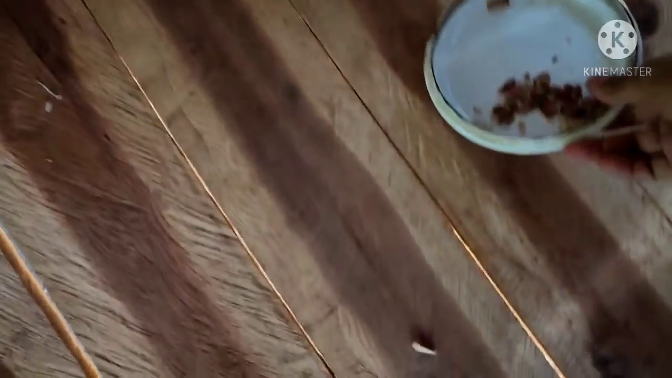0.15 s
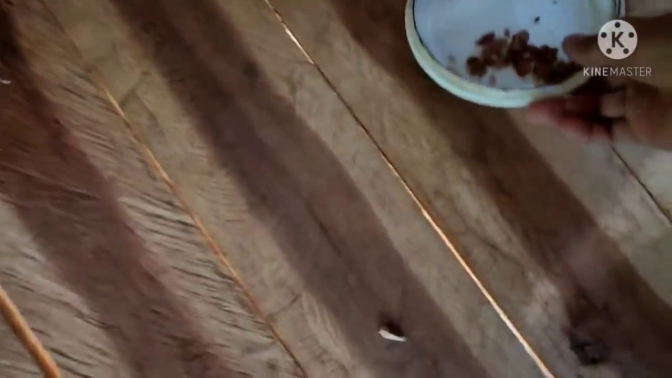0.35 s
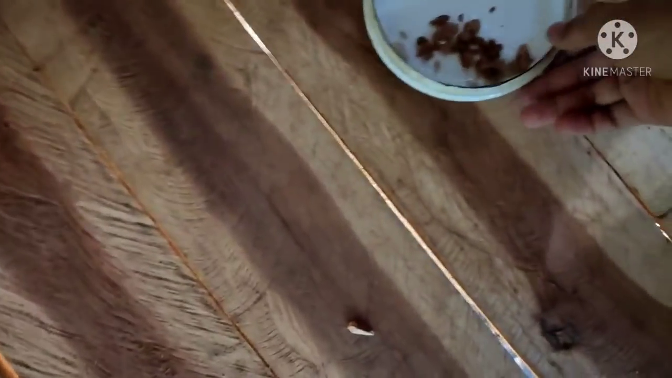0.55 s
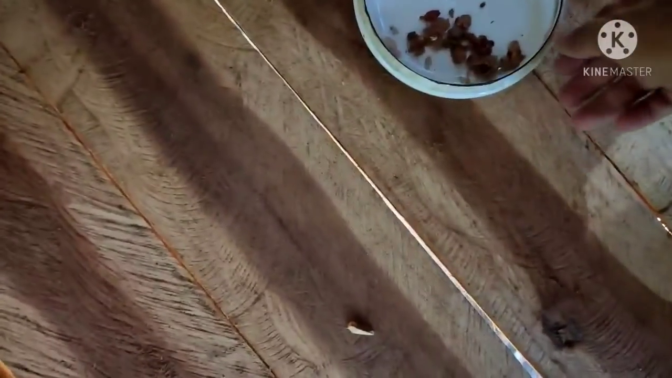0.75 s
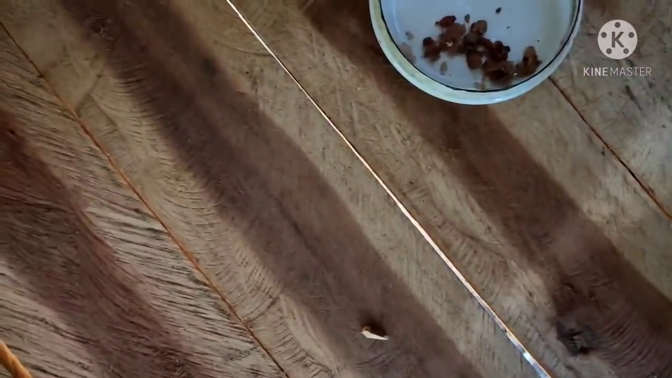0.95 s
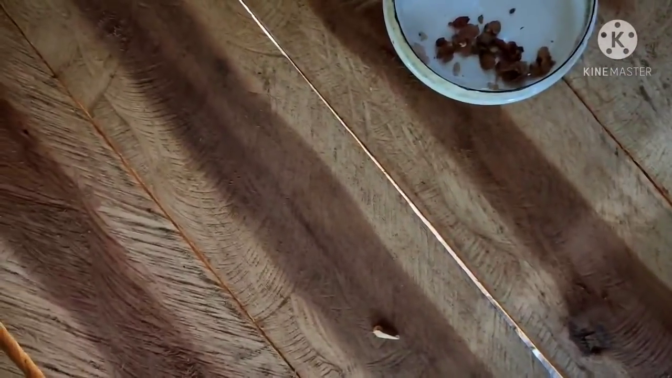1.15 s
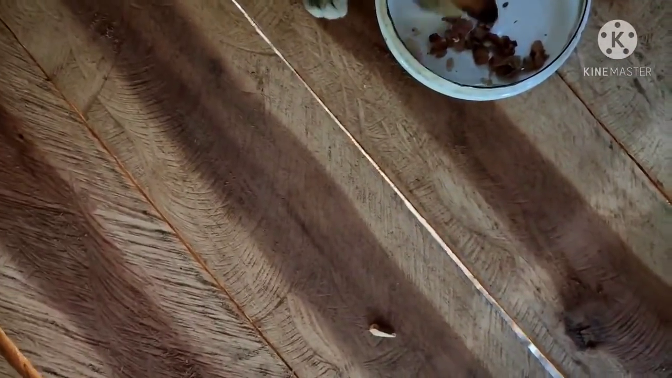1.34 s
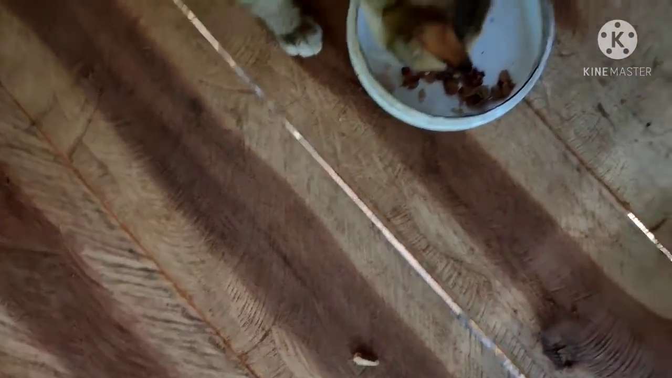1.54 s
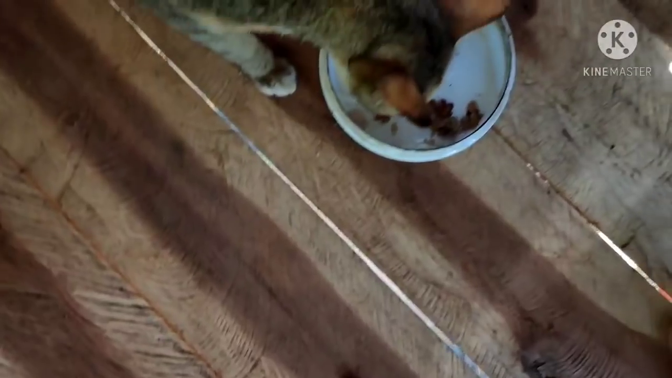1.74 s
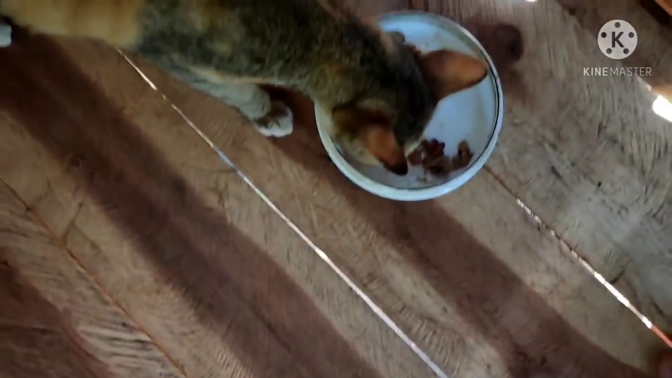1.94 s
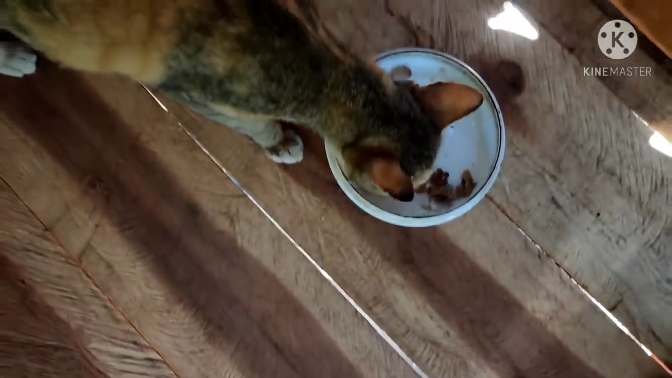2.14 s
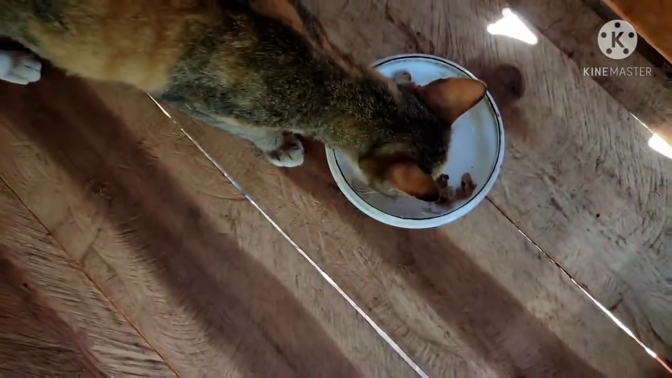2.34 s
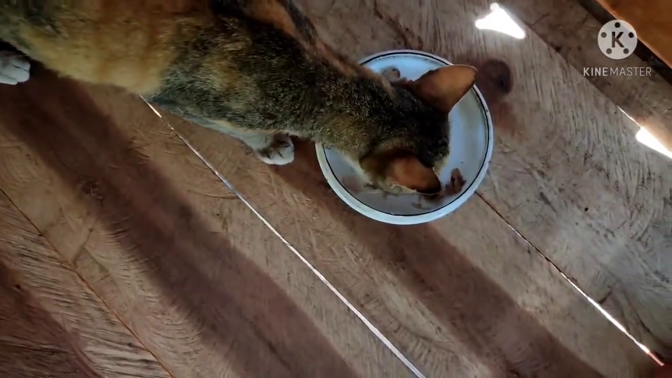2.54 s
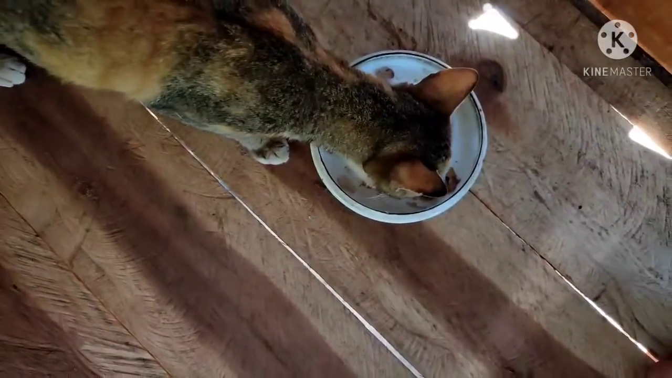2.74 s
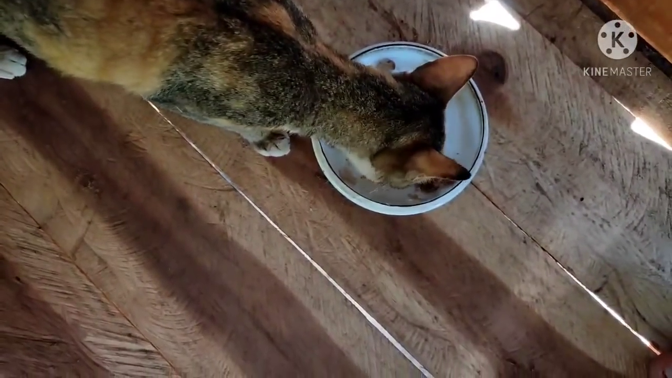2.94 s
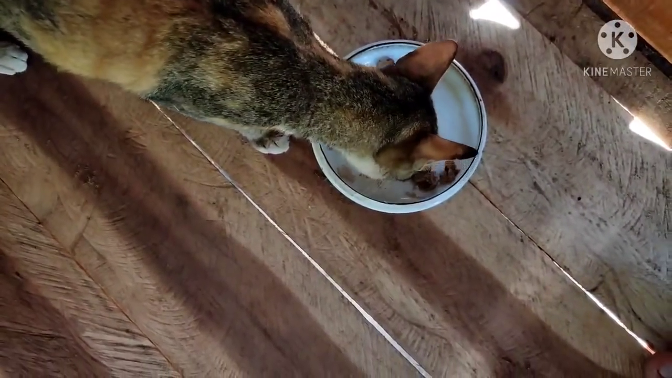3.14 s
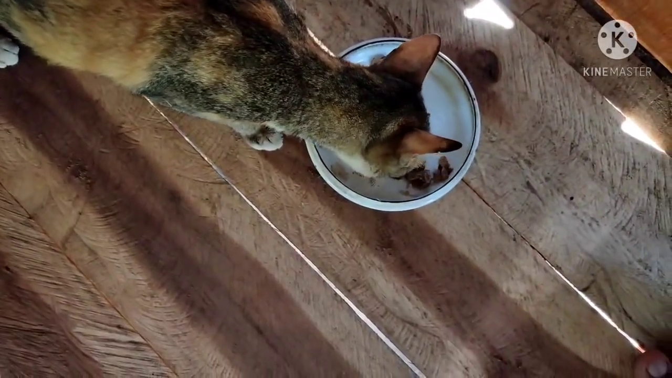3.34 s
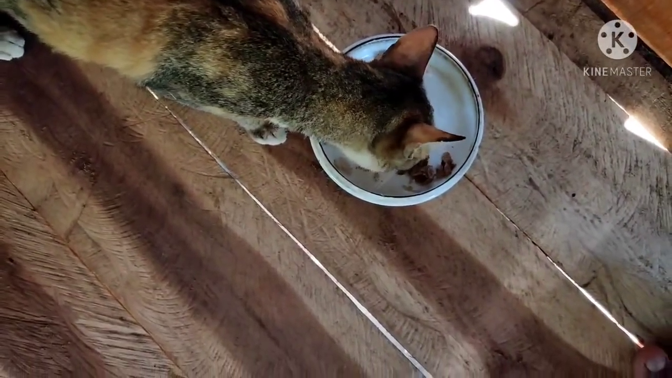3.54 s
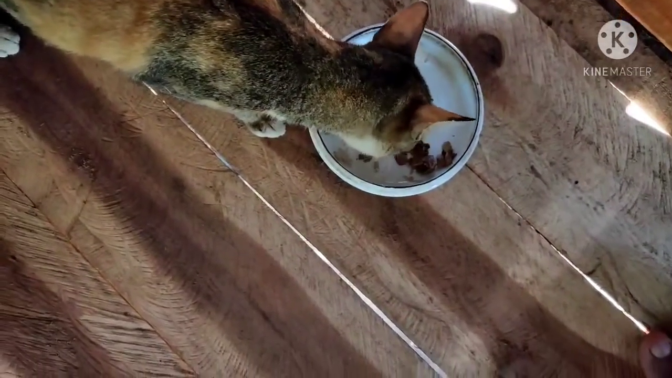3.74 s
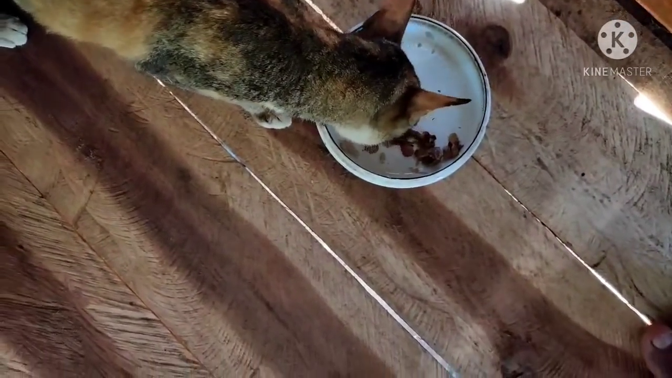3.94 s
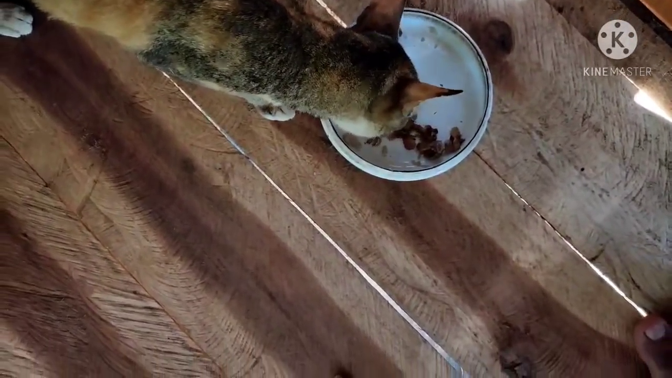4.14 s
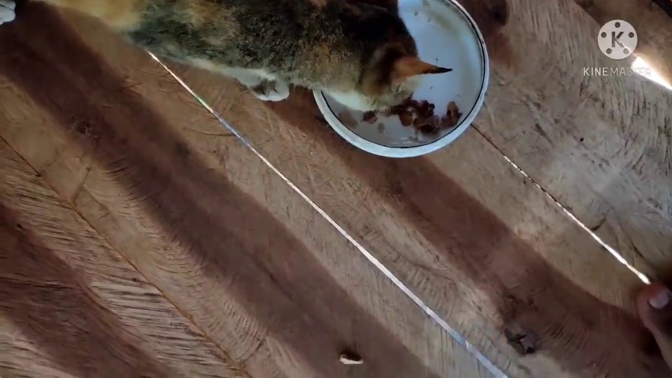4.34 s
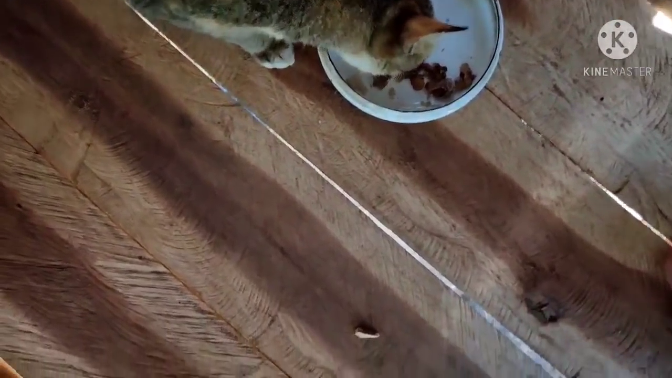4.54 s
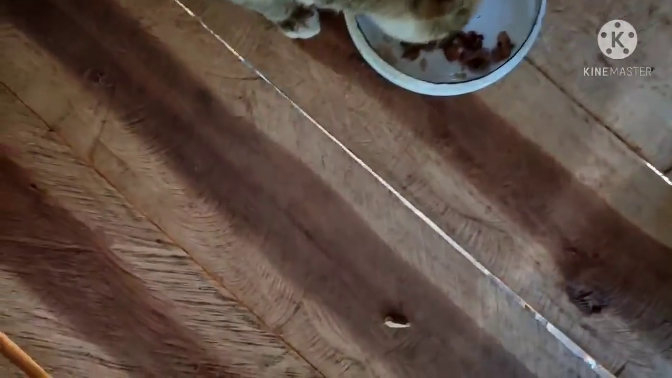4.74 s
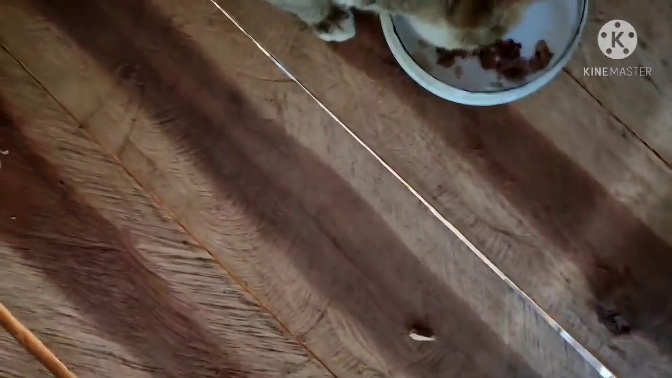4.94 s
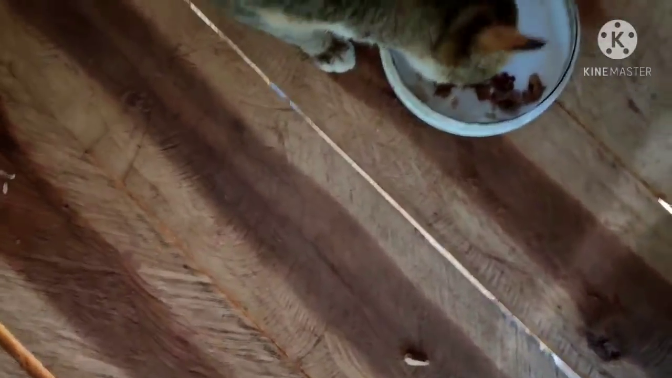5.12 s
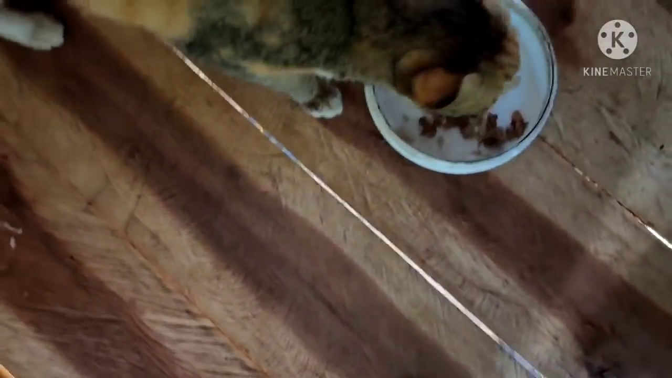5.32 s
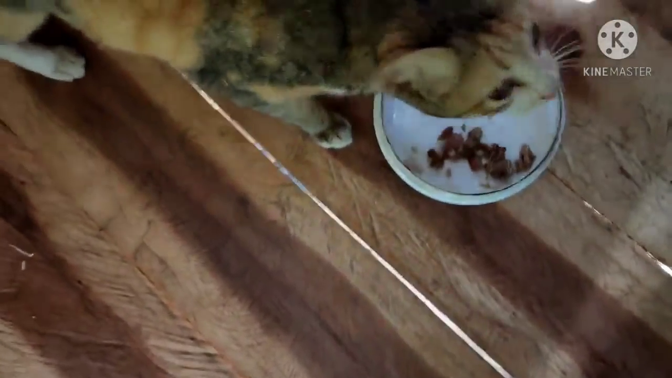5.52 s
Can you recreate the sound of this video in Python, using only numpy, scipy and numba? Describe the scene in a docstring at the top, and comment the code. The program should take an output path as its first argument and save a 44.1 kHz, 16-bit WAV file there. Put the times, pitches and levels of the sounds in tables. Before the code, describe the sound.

An enamel plate scrapes and bangs down on wooden floorboards, then a cat eats with soft smacks, clicks and small plate knocks in a quiet hut.

```python
"""Cat eating from an enamel plate

An enamel plate is set down on the floorboards of a quiet hut and a cat eats from it, nudging it about.
Knocks excite decaying modes of boards and plate; the scraping rim drives the boards with random slips.
A hiss of banded noise swells and shuts over a wavering low hum and a deep rumble.
Short rings glide upward, ticks are noise bursts, chewing and hollow rustles are narrow bands of grains.
A microphone with two spaced ports hears it all, dull above 8 kHz, and clips on the loudest knock.
"""
import sys
import numpy as np
from scipy import signal
from scipy.fft import rfft, irfft
from scipy.io import wavfile
from scipy.ndimage import uniform_filter1d
from numba import njit

SR = 44100
rng = np.random.default_rng(int(sys.argv[2]) if len(sys.argv) > 2 else 0)


def digitize_waveform(pressure):
    """Quantize a signal to 16-bit integers and store it at the path in sys.argv[1].

    Rows of a 2-D input are taken as channels; values are limited to [-1, 1].
    """
    field = np.atleast_2d(pressure).T
    bounded = np.clip(field, -1, 1)
    quanta = np.round(bounded * 32767).astype(np.int16)
    wavfile.write(sys.argv[1], SR, quanta)


N = 245897
T = np.arange(N) / SR
PORT_LAG_S, FLOOR_LAG_S = .00034, .0002  # sound from the side, sound from the boards below


def undb(db):
    """Decibel law: 20 dB is a factor of ten in amplitude."""
    return 10 ** (np.asarray(db) / 20)


def level(x, db):
    """Root-mean-square normalisation to a level in dB."""
    return x * undb(db) / np.sqrt(np.mean(x ** 2))


def band(x, lo_hz, hi_hz, order=2):
    """Band-pass filtering with a maximally flat (Butterworth) response."""
    edges_hz = [lo_hz, min(hi_hz, .45 * SR)]
    return signal.sosfilt(signal.butter(order, edges_hz, "bandpass", fs=SR, output="sos"), x)


def decay(t, t60_s):
    """Exponential decay by 60 dB in the time t60."""
    return np.exp(-np.log(1000) * t / t60_s)


def contour(table):
    """Linear interpolation in dB between the listed moments."""
    start_s, level_db = np.transpose(table)
    return np.interp(T, start_s, level_db)


def walk(rate_hz):
    """Smoothed random modulation: levels held 1 / rate and averaged twice, with a spread near 1."""
    hold = int(SR / rate_hz)
    steps = np.repeat(rng.standard_normal(N // hold + 1), hold)
    return 1.3 * uniform_filter1d(uniform_filter1d(steps, hold), hold)[:N]


def panned(db, pan_db):
    """Level-difference stereo: half the left-minus-right dB is added left, half taken off right."""
    return undb(db + np.array([pan_db, -pan_db]).reshape(2, -1) / 2)


def ports(draw, alike, lag_s=PORT_LAG_S):
    """Partial coherence: two ports share one part, the right later, and each has its own diffuse part."""
    alike = np.clip(alike, 0, 1)
    shared = draw()
    pair = np.array([shared, np.roll(shared, int(lag_s * SR))])
    return np.sqrt(alike) * pair + np.sqrt(1 - alike) * np.array([draw(), draw()])


@njit
def svf(x, hz, q):
    """State-variable resonance with moving centre and sharpness, gain 1 at the centre."""
    y, b, l = np.empty(len(x)), 0., 0.
    for i in range(len(x)):
        g, k = np.tan(np.pi * hz[i] / SR), 1 / q[i]
        v = (b + g * (x[i] - l)) / (1 + g * (g + k))
        b, l, y[i] = 2 * v - b, l + 2 * g * v, k * v
    return y


# Spectrum of the hum before its overall level is set: pitch_hz [Hz], density_db [dB per Hz]
HUM_COLOUR = [(15, -70), (25, -46.5), (53, -36), (80, -11), (100, -10.5), (118, -8.5), (140, -7),
              (160, -14), (181, -8.5), (216, -20.5), (317, -29), (479, -33), (780, -37), (1320, -61)]
# Level of the low hum, which swells around the knocks, before wavering: start_s [s], level_db [dB]
HUM = [(0.0, -39), (0.04, -50.5), (0.34, -46), (0.378, -36.5), (0.69, -48.5), (0.72, -37), (0.82, -49),
       (1.19, -65), (1.26, -49), (1.43, -64.5), (2.54, -58), (3.29, -67), (3.82, -55.5), (4.13, -70.5),
       (4.19, -50.5), (4.48, -58.5), (4.64, -43.5), (4.95, -57.5), (5.04, -46), (5.16, -60.5),
       (5.57, -62.5)]


def hum():
    """Spectral shaping of noise: a low wavering hum, nearly the same at both ports."""
    hz, db = np.transpose(HUM_COLOUR)
    bins_hz = np.fft.rfftfreq(N, 1 / SR) + 1
    colour = undb(np.interp(np.log(bins_hz), np.log(hz), db))

    def coloured():
        return level(irfft(rfft(rng.standard_normal(N)) * colour, N), 0)
    return ports(coloured, alike=0.81, lag_s=0) * undb(contour(HUM) + 1.5 * walk(9))


# Thin tones inside the hum: pitch_hz [Hz, before drift], level_db [dB rms, before wavering]
HUM_LINES = [(118, -65.5), (177, -74)]


def tones():
    """Frequency and amplitude modulation: each thin tone drifts a little in pitch, swells and sinks."""
    out = 0
    for hz, db in HUM_LINES:
        waver = undb(3 + 4 * walk(9))  # 3 dB turns the rms level into a peak
        phase = 2 * np.pi * np.cumsum(hz * (1 + 0.019 * walk(4.4))) / SR
        out = out + undb(db) * waver * np.sin(phase)
    return out


# Deep rumble that swells and sinks, before its unevenness: start_s [s], level_db [dB]
RUMBLE = [(0.0, -58), (0.18, -52), (0.31, -74), (0.39, -46), (0.45, -82), (0.74, -60.5), (0.78, -65.5),
          (1.13, -82), (1.3, -66), (1.44, -81), (2.48, -76.5), (3.04, -92), (4.67, -70), (4.89, -76),
          (5.05, -62), (5.2, -70), (5.57, -89)]


def rumble():
    """Low-frequency band noise: a deep uneven rumble, the same at both ports."""
    deep = level(band(rng.standard_normal(N), 27, 82, order=3), 0)
    return undb(contour(RUMBLE) + 2.0 * walk(6)) * deep


# Swells of drag and hiss: start_s [full strength, s], rise_s [s], hold_s [s], drag_db [dB],
# drag_pitch_hz [Hz], sharpness [Q], hiss_db [dB], middle_db [middle of the hiss, relative dB],
# pan_db [left minus right, dB]
SWELLS = [(0.0, .01, 0.025, -39, 575, 0.23, -52, 7, 0.5), (0.141, 0.015, 0.028, -30, 709, 0.3, -43.5, 7, 1),
          (0.26, .1, 0.087, -49, 424.2, 1.1, -59.5, -7, 2),
          (0.369, 0.0056, 0.0067, -33.5, 698.5, 1.4, -40, -19, 2),
          (0.469, 0.012, .02, -34, 491.2, 1.9, -51.5, 3.5, -1),
          (0.703, .005, 0.022, -45.5, 481.2, 1.7, -55.5, -0.5, 2),
          (0.998, 0.054, .05, -79, 473, 2.9, -73.5, -16, 0),
          (1.211, 0.013, 0.064, -71, 877.4, 3.3, -47, -6, 3),
          (1.266, 0.036, .06, -46, 792.6, 1, -44.5, 1, 3.5),
          (1.578, .12, .04, -65, 912.3, 2.6, -50, -0.5, 6.5),
          (1.677, 0.076, .13, -71.5, 888, 2.2, -50, -5, 4),
          (1.927, .1, 0.033, -73.5, 970, 3.4, -52.5, -12.5, 6.5),
          (2.164, 0.18, .02, -64.5, 966, 2.2, -48.5, -7, 5),
          (2.314, 0.16, 0.015, -53.5, 847, 1.4, -44, -0.5, 4.5),
          (2.442, 0.046, 0.012, -57.5, 897, 2, -43.5, -0.5, 5),
          (2.458, .005, 0.037, -47, 591.5, 3.7, -44, 5, 0.5),
          (2.568, .03, .05, -56.5, 591, 2.6, -72, -4, 4),
          (2.835, 0.11, 0.088, -86, 519.9, 2, -77.5, -23, 9.5),
          (3.291, 0.14, .08, -74, 1000, 2, -59, -11.5, 7),
          (3.449, 0.04, 0.11, -58.5, 925.4, 2.2, -48, -1.5, 4),
          (3.647, .04, 0.13, -76.5, 843, 2.5, -54.5, -10.5, 2.5),
          (3.789, 0.066, 0.06, -45.5, 638.3, 0.46, -47.5, 1.5, 3.5),
          (4.037, .06, 0.074, -84.5, 801, 2.7, -64, -16, 10),
          (4.158, 0.055, .02, -50.5, 854.7, 1.8, -52.5, 2.5, 0.5),
          (4.186, 0.014, .03, -41.5, 564.3, 0.65, -50, -2.5, 2), (4.265, .05, .05, -49, 542, .8, -60, 0, 0),
          (4.345, 0.051, 0.097, -45, 510.5, 0.44, -53, 1.5, 2.5),
          (4.494, 0.058, 0.049, -57, 777.4, 1.7, -53.5, 2.5, 4.5),
          (4.566, 0.027, .03, -40, 543.7, 1.3, -53.5, 2, 2),
          (4.621, .005, 0.055, -36, 781, 2.1, -46, 1, 0.5),
          (4.718, 0.07, 0.2, -59.5, 942, 1.2, -45.5, 2.5, 4.5),
          (4.934, 0.045, 0.12, -59.5, 919, 2.6, -52, 1.5, 4),
          (5.157, .05, 0.087, -76.5, 682, 1.6, -65.5, -15, 8.5),
          (5.346, 0.16, 0.094, -63.5, 598.3, 1.8, -61, -16, 13),
          (5.505, 0.12, 0.023, -57.5, 761.6, 1.7, -53, -15.5, 6)]
RISE_DB = 22.5  # a swell grows by this much during its rise
DRAG_FADE_DB_PER_S, HISS_FADE_DB_PER_S = 230.5, 220


def follow(db, fade_db_per_s, *traits):
    """Power summation: swells rise, hold and fade; gives the total in dB and power-weighted traits."""
    s, rise, hold = np.transpose(SWELLS)[:3, :, None]
    t = T[::32]
    growth_db = -RISE_DB * np.maximum(s - t, 0) / np.maximum(rise, .005)
    fade_db = -fade_db_per_s * np.maximum(t - s - hold, 0)
    power = undb(db[:, None] + growth_db + fade_db) ** 2 + 1e-30
    total = power.sum(axis=0)
    curves = [10 * np.log10(total)] + [trait @ power / total for trait in traits]
    return [np.interp(T, t, c) for c in curves]


def hiss():
    """Band-limited noise: a bright peak and a flatter middle whose narrow bands open and shut in patches."""
    *_, db, mid_db, pan_db = np.transpose(SWELLS)
    db, mid_db, pan_db = follow(db, HISS_FADE_DB_PER_S, mid_db, pan_db)

    def noise(lo, hi):
        return lambda: level(band(rng.standard_normal(N), lo, hi, order=2 if lo > 6000 else 4), 0)
    out = ports(noise(6400, 7400), alike=.2) + undb(-6) * ports(noise(5200, 7900), alike=.25)
    out = out * undb(0.93 * walk(18) + 2.3 * walk(90.0))
    flutter_db = 2.0 * walk(250.0)  # a fast random flutter shared by all the middle bands
    patchy_db = np.clip(2.3 - .35 * mid_db, 1.5, 8)  # the fainter the middle, the patchier
    for hz in np.arange(1150, 6000, 200):
        tilt_db = -18.5 - 1.0 * np.log2(hz / 2500)
        gain = undb(mid_db + tilt_db + patchy_db * walk(13.0) + flutter_db)
        out = out + gain * ports(noise(hz, hz + 200), alike=0.034)
    return out * panned(db, pan_db)


# Modes of the floorboards: pitch_hz [Hz], level_db [relative dB], t60_s [full ring time, s]
BOARDS = [(230, -2.5, .17), (280, -4.5, 0.16), (379.5, -3.5, 0.18), (426.3, -10, .15), (484, -8, .14),
          (538, -4, 0.09), (630.8, -6, 0.11), (685.6, -2, 0.064), (800, -2, 0.13), (900.3, -2.5, 0.08),
          (1006, -10.5, 0.11), (1127, -3.5, 0.09), (1232, -13, 0.086), (1434, -17, 0.13), (1627, -15, 0.27),
          (1740, -15, 0.13), (1838, -17, .09), (2110, -15.5, 0.11), (2280, -13, 0.063), (2518, -13, 0.03),
          (2700, -19, 0.054), (3293, -22, .05)]
# Modes of the enamel plate: pitch_hz [Hz], level_db [relative dB], t60_s [full ring time, s]
PLATE = [(464, 4, 0.12), (550, -11.5, 0.06), (790, -1, 0.12), (800, -20.5, 0.063), (1106, -9.5, 0.083),
         (1916, -10.5, 0.065), (1994, -27, .07), (2720, -21, .06)]
WOOD_TOP_HZ = 1320  # the boards pass little above this pitch


def scrape():
    """Stick-slip friction: dense uneven slips ring the boards around the pitch of the drag."""
    _, _, _, db, hz, q, _, _, pan_db = np.transpose(SWELLS)
    db, hz, q, pan_db = follow(db, DRAG_FADE_DB_PER_S, hz, q, pan_db)
    q = np.clip(q, .7, 8)

    def slips():
        impulses = (rng.random(N) < 1500 / SR) * rng.standard_normal(N)  # about 1500 a second
        grit = impulses * undb(1.2 * walk(60))
        wood = sum(svf(grit, f + 0 * T, f / 35 + 0 * T) for f, _, _ in BOARDS[:13] + PLATE[:1])
        # a sharper drag passes fewer modes, each the louder
        focused = np.sqrt(q) * svf(svf(wood, hz, q), hz, q)
        return level(focused, 0) + level(wood, -2.5)
    return panned(db, pan_db) * band(ports(slips, alike=0.4), 150, WOOD_TOP_HZ, order=4)


# Short bright ticks, several at the onset of knocks: start_s [s], level_db [dB, scales the snap],
# pan_db [left minus right, dB]
TICKS = [(0.1452, -41, 3), (1.208, -66, 4.5), (1.246, -31, 11), (3.507, -34, 6), (0.44, -32, 3),
         (1.6, -35, -4), (0.3765, -19.5, 1.5), (4.655, -40, 2), (2.169, -46.5, -3.5), (2.2957, -34.5, 8),
         (2.4671, -20, 11), (4.1872, -31, -8), (4.5483, -36, -2), (4.6185, -28, 1), (5.1073, -42, 7)]


def ticks():
    """Impulsive excitation: a few milliseconds of bright noise."""
    out, t = np.zeros((2, N + SR)), np.arange(SR // 20) / SR
    for s, db, pan_db in TICKS:
        noise = level(band(rng.standard_normal((2, len(t))), 930, 12000, order=2), -7.5)
        i = int(s * SR)
        out[:, i:i + len(t)] += panned(db, pan_db) * noise * np.exp(-t / 0.0048)
    return out[:, :N]


SPOT_DB = 6  # a mode one octave off the centre of a blow is this much weaker
BRIGHT_HZ, FULL_CRACK_DB = 1300, -8  # modes above this pitch sound fully only in a crack this bright


def ring(modes, t, mid_hz, damp, crack_db):
    """Modal superposition: decaying modes, strongest near the blow's centre, weighed anew at each spot."""
    hz, db, t60 = np.transpose(modes)[:, :, None]
    spot = rng.standard_normal((4, len(modes), 1))
    octaves_off = np.log2(np.minimum(hz, 1500) / mid_hz)
    gain = undb(db + 1.5 * spot[0] - SPOT_DB * octaves_off ** 2)
    gain = gain * np.where(hz > BRIGHT_HZ, undb(0.4 * (crack_db - FULL_CRACK_DB)), 1)
    lagged = t - np.array([0, FLOOR_LAG_S])[:, None, None]
    turn = 2 * np.pi * hz * lagged + .7 * spot[1] + .3 * spot[2:]  # the ports differ a little
    y = (gain * np.sin(turn) * decay(t, damp * t60)).sum(axis=1)
    return y / np.sqrt(np.sum(gain ** 2))


# Rim meets wood: start_s [s], level_db [dB, scales the blow], thud_db [floor thud, relative dB],
# crack_db [bright crack, relative dB], pan_db [left minus right, dB], pitch_hz [centre of the body, Hz],
# plate_share [0-1], ring_share [share of the full ring time], drop_s [level drops after, s]
KNOCKS = [(0.305, -37.5, 0.5, -34, -11, 442, 0.58, 0.2, 0.093),
          (0.358, -20.5, -18, -32.5, 2, 495, 0.07, 0.49, .077),
          (0.376, 4.5, -22, -24, 1.5, 860, 0.05, 0.55, .077),
          (0.463, -22, -9, -14.5, -1, 470, 0.2, 0.31, .07), (0.702, -28, 3.5, -46, 1, 283, 0.2, 0.39, .07),
          (0.716, -9, -18, -37, 1, 600, 0.04, 0.82, .059),
          (1.246, -37, -13.5, -23, 1.5, 585, 0.39, 1.3, 0.084),
          (1.26, -29, -11, -24.5, 5, 490, 0, .4, .077),
          (2.468, -21.5, -25, -13.5, 6, 847, 0.2, 1.07, 0.058),
          (2.485, -24.5, -12, -28, -2, 445, 0.43, 0.79, 0.077),
          (2.649, -39.5, -27, -42, -3.5, 720, 1, 0.42, .045),
          (4.186, -23, -17, -16, -2.5, 544, 0.54, 1.2, 0.074),
          (4.283, -38, -9, -23.5, -1, 400, 0.2, 0.36, .07),
          (4.341, -36.5, -15.5, -28, -4, 503, 0.35, 1.3, 0.054),
          (4.547, -22, -15.5, -19, -2, 600, 0.58, 0.89, 0.041),
          (4.618, -17, -22, -19.5, -1.5, 520, 0.62, 0.92, 0.14),
          (4.652, -24.5, -20, -42, -2, 800, 0.91, 1.74, 0.024),
          (5.009, -41, -6, -22, 14, 834, 0.21, 0.69, .077)]
THUD_HZ, THUD_T60_S = 145, .15
CONTACT_MS, SOFTER = 0.42, .5  # the duller the crack, the longer the rim takes to land
DROP_DB = -8.5  # the ring drops abruptly in level


def knocks():
    """Impact excitation: each blow rings boards and plate as the rim rattles, with a thud and a crack."""
    out, t = np.zeros((2, N + SR)), np.arange(SR // 3) / SR
    n = SR // 30
    for s, db, thud_db, crack_db, pan_db, mid_hz, share, damp, drop_s in KNOCKS:
        share, damp = np.clip(share, 0, 1), max(damp, .1)
        rattle = .08 * np.exp(-t[:n] / .012) * rng.standard_normal(n) * (rng.random(n) < .03)
        rattle[0] = 1  # the first contact
        body = (1 - share) * ring(BOARDS, t, mid_hz, damp, crack_db)
        body = body + share * ring(PLATE, t, mid_hz, damp, crack_db)
        # the many board modes too close to tell apart blur into a short dull roar
        roar = level(band(rng.standard_normal((3, len(t))), mid_hz / 1.7, 1192, order=6), -14.0)
        roar = roar * np.exp(-t / (damp * 0.024))
        body = body + 0.39 * roar[0] + 0.21 * roar[1:]
        contact_ms = np.clip(CONTACT_MS * undb(SOFTER * (FULL_CRACK_DB - crack_db)), .3, 8)
        onset = (1 - np.exp(-t * 1e3 / contact_ms)) ** 2
        body = signal.fftconvolve(-body * onset, rattle[None])[:, :len(t)]
        body = body / np.sqrt(np.mean(body[:, :SR // 70] ** 2)) * undb(-7)  # level of the first 14 ms
        body = body * undb(DROP_DB * np.clip((t - drop_s) / .008, 0, 1))
        thud = np.sin(2 * np.pi * THUD_HZ * t) * decay(t, THUD_T60_S) * (1 - np.exp(-t / 0.0011))
        crack = level(band(rng.standard_normal((2, len(t))), 1500, 2500, order=2), crack_db)
        crack = crack * (np.exp(-t / 0.0076) + 0.48 * np.exp(-t / 0.025))
        i = int(s * SR)
        out[:, i:i + len(t)] += panned(db, pan_db) * (body + crack) + undb(db + thud_db) * thud
    return band(out[:, :N], 110, 9000, order=3)


ROOM_T60_S, ROOM_DB = 0.24, -20.5


def room(x):
    """Reverberation: the small wooden hut answers with a short dull tail, different at each port."""
    t = np.arange(SR // 2) / SR
    tail = band(rng.standard_normal((2, len(t))), 110, 1300) * decay(t, ROOM_T60_S) * (t > .006)
    tail = undb(ROOM_DB) * tail / np.sqrt(np.sum(tail ** 2, axis=1, keepdims=True))
    return x + signal.fftconvolve(x.mean(axis=0, keepdims=True), tail, axes=1)[:, :N]


# Narrow bands that stand out of the rustle for a moment: start_s [s], length_s [s], pitch_hz [Hz],
# width_hz [Hz], level_db [dB, scales the grains]
HOLLOWS = [(0.566, 0.083, 850, 299.2, -54.5), (1.215, 0.078, 2250, 250, -56),
           (1.695, 0.12, 2350, 200, -65.5), (1.741, 0.068, 880, 248, -61.5), (1.936, 0.15, 2600, 200, -69),
           (2.03, .08, 1750, 200, -72.5), (2.111, 0.047, 3400, 301, -66), (2.127, 0.098, 1000, 252, -63),
           (2.212, 0.074, 610, 149, -60.5), (2.3, 0.067, 820, 200, -53.5), (2.553, 0.0967, 590, 60, -50.5),
           (3.261, 0.075, 2450, 248, -70.5), (3.288, .08, 3200, 343, -72), (3.352, 0.08, 1600, 200, -70.5),
           (3.484, .13, 950, 253, -56.5), (3.74, .05, 900, 201, -55), (4.132, 0.0527, 833, 70, -43),
           (4.498, .045, 930, 150, -58), (4.717, 0.062, 2650, 300, -51.5), (5.304, 0.14, 620, 249.3, -61),
           (5.337, .06, 1300, 250, -75), (5.418, .11, 1950, 297, -70), (5.43, 0.15, 840, 200, -63)]
HOLLOW_EDGE_S, HOLLOW_PAN_DB = 0.0089, 9.5  # opening and shutting time, left minus right


def hollows():
    """Band-pass resonance: grainy noise in one narrow band that opens and shuts quickly."""
    out = np.zeros((2, N))
    lag = 15  # samples between the ports
    for s, length, hz, width_hz, db in HOLLOWS:
        i, n = int(s * SR), int(max(length, .02) * SR)
        t = np.arange(min(n, N - i)) / SR
        grains = rng.standard_normal((3, SR // 4)) * (rng.random(SR // 4) < .1)
        x = level(band(grains, hz - width_hz / 2, hz + width_hz / 2, order=3), -3)
        x = x[:, -len(t) - lag:]
        pair = np.array([x[0, lag:] + .6 * x[1, lag:], x[0, :-lag] + .6 * x[2, lag:]])
        gate = np.clip(np.minimum(t, t[-1] - t) / max(HOLLOW_EDGE_S, .003), 0, 1)
        out[:, i:i + len(t)] += panned(db, HOLLOW_PAN_DB) * pair * gate
    return out


# Short rings, being smacks, small taps and high rings at a knock: start_s [s],
# level_db [dB, before roughening], pitch_hz [at the start, Hz], t60_s [s]
SHORT_RINGS = [(0.702, -58.5, 3630, 0.042), (0.704, -59, 5450, .06), (0.716, -48, 3700, 0.05),
               (0.717, -56, 4130, .05), (0.717, -58, 5450, .06), (1.56, -52.5, 800, 0.11),
               (1.609, -48, 915, 0.044), (1.749, -57.5, 809, 0.26), (1.809, -56, 890, 0.031),
               (1.913, -56, 1025, 0.04), (2.035, -62.5, 540, 0.065), (2.269, -42.5, 1650, 0.043),
               (2.436, -46, 918, 0.22), (2.651, -45, 816, 0.039), (3.288, -66, 1600, 0.061),
               (3.31, -62, 1194, .08), (3.385, -64.5, 550, 0.12), (3.544, -55, 936, 0.16),
               (3.65, -59.5, 924, 0.094), (4.915, -50, 998, 0.082), (5.239, -58.5, 675, 0.069),
               (5.319, -54.5, 693, 0.09), (5.353, -50, 623, 0.055), (5.509, -51, 862, 0.082)]
RING_PAN_DB = 20  # left minus right
ROUGH_T60_S = .12  # rings longer than this come out cleaner


def short_rings():
    """Amplitude-modulated resonance: a short ring glides up a little, roughened by slow noise."""
    out, t = np.zeros((2, N + SR)), np.arange(SR // 4) / SR
    for s, db, hz, t60 in SHORT_RINGS:
        noise = level(band(rng.standard_normal((2, len(t))), 15, 90, order=3), 0)
        roughness = 1 + .5 * min(ROUGH_T60_S / t60, 1) * noise
        tone = np.sin(2 * np.pi * hz * (t + 0.077 * t ** 2 - np.array([[0], [PORT_LAG_S]])))
        envelope = decay(t, max(t60, .01)) * (1 - np.exp(-t / 0.001)) ** 2
        i = int(s * SR)
        out[:, i:i + len(t)] += panned(db, RING_PAN_DB) * roughness * tone * envelope
    return out[:, :N]


# Gritty band while the cat chews: start_s [s], level_db [dB, before panning]
CHEWING = [(1.45, -86.5), (1.488, -89.5), (1.56, -55.5), (1.616, -45.5), (1.636, -55), (1.702, -63),
           (1.776, -59.5), (1.888, -75), (1.92, -57.5), (2.058, -98), (2.1, -77.5)]
CHEW_LO_HZ, CHEW_HI_HZ = 781, 1084


def chewing():
    """Granular excitation: dense grains of sound in one hollow band with steep edges."""
    def grains():
        impulses = (rng.random(N) < 900 / SR) * rng.standard_normal(N)  # about 900 a second
        return level(band(impulses, CHEW_LO_HZ, CHEW_HI_HZ, order=5), 0)
    during = (T > CHEWING[0][0]) & (T < CHEWING[-1][0])
    return during * panned(contour(CHEWING), 7.2) * ports(grains, alike=0.78)


FLOOR_DB, AIR_DB = -76, -82.5  # steady background noise, self-noise of the microphone
MIC_HZ, TOP_HZ = 7726, 15500  # upper limits of the microphone and of the whole sound


def scene():
    """Linear superposition of all sources over a faint steady noise; only the knocks excite the room."""
    floor = level(band(rng.standard_normal((2, N)), 180, 2900, order=1), FLOOR_DB)
    low = hum() + tones() + rumble()
    plate = scrape() + ticks() + room(knocks())
    return low + hiss() + plate + hollows() + short_rings() + chewing() + floor


def record(dry):
    """Band limiting and clipping: the microphone stops near 8 kHz, faint self-noise lies above."""
    heard = signal.sosfilt(signal.ellip(10, .3, 70, MIC_HZ, fs=SR, output="sos"), dry)
    heard = heard + level(band(rng.standard_normal(dry.shape), 11000, 17000, order=3), AIR_DB)
    clipped = np.clip(heard, -1, 1)
    return signal.sosfilt(signal.ellip(8, .1, 50, TOP_HZ, fs=SR, output="sos"), clipped)


dry = scene()
out = record(dry)
digitize_waveform(out)
```